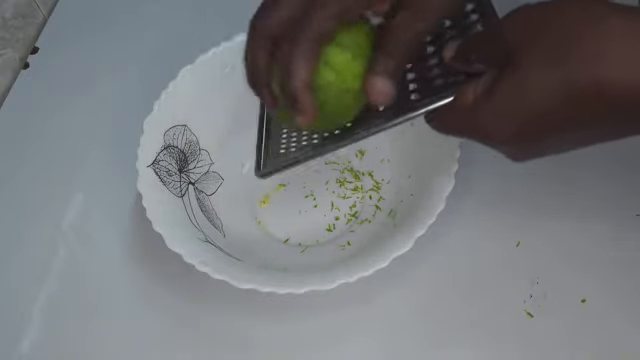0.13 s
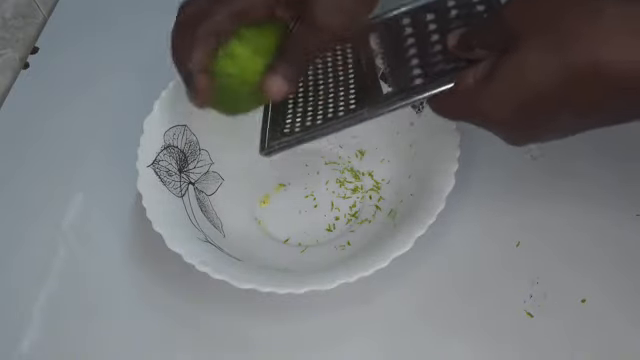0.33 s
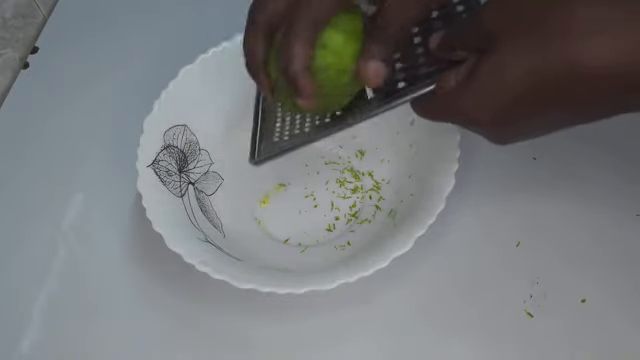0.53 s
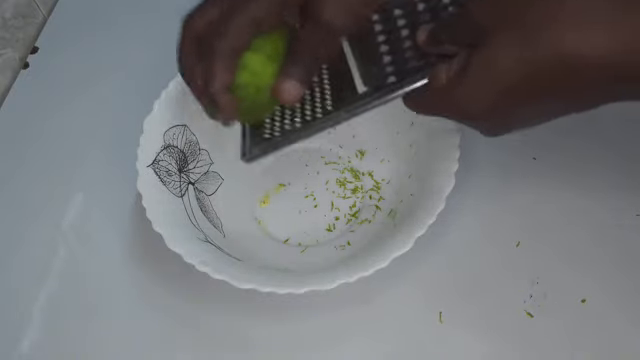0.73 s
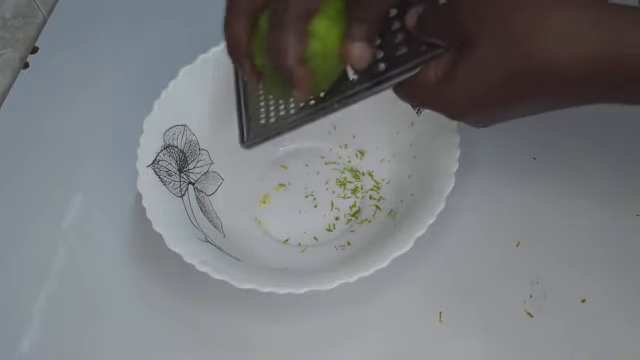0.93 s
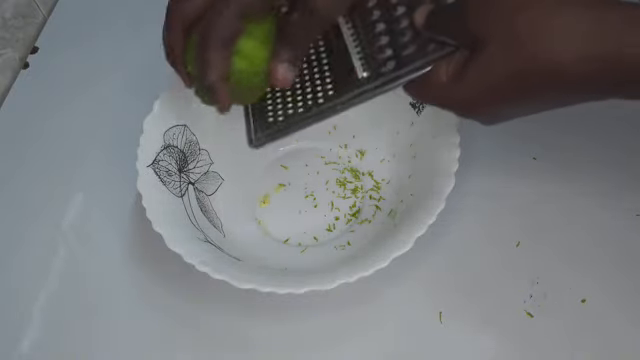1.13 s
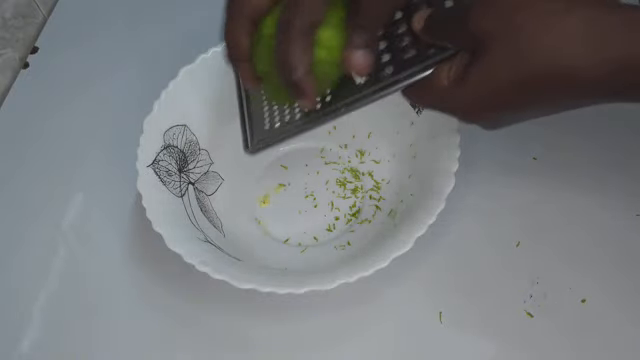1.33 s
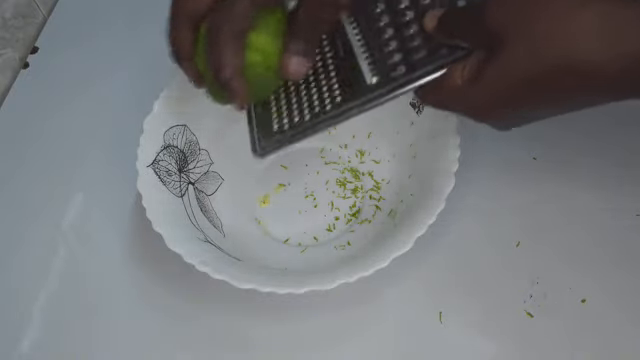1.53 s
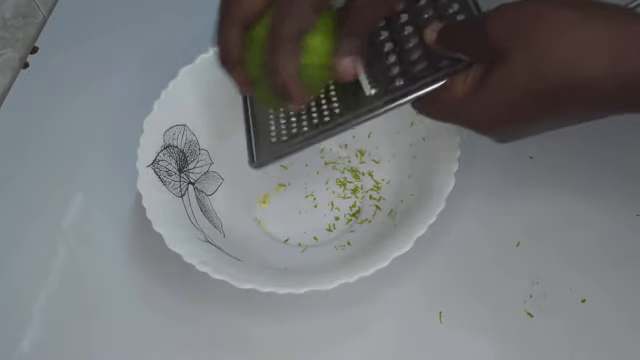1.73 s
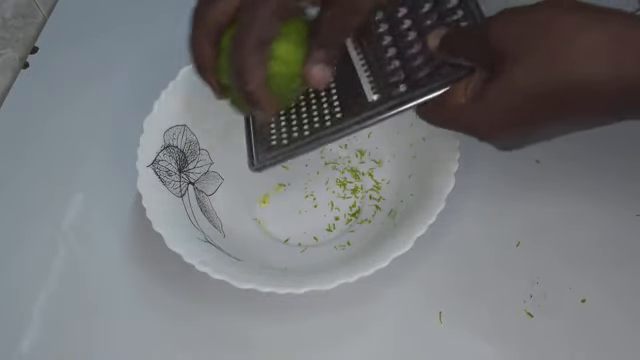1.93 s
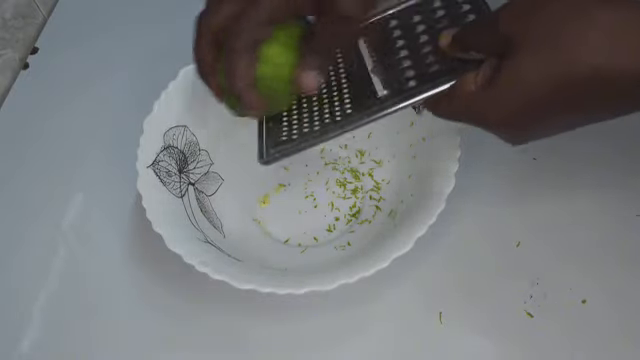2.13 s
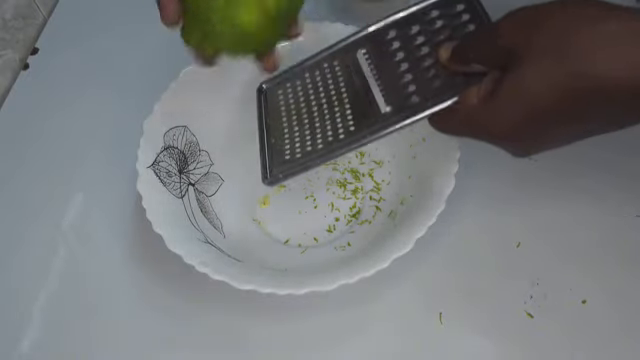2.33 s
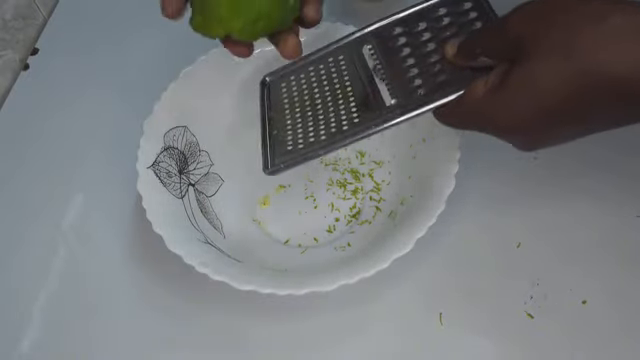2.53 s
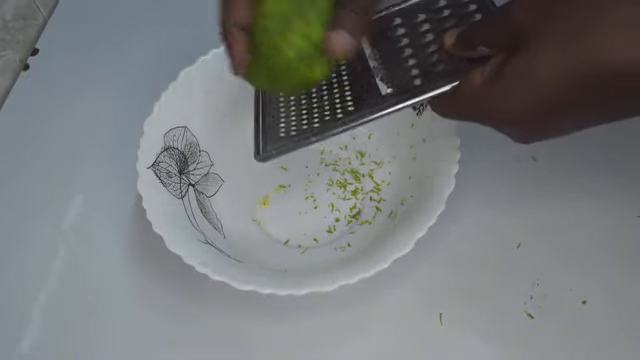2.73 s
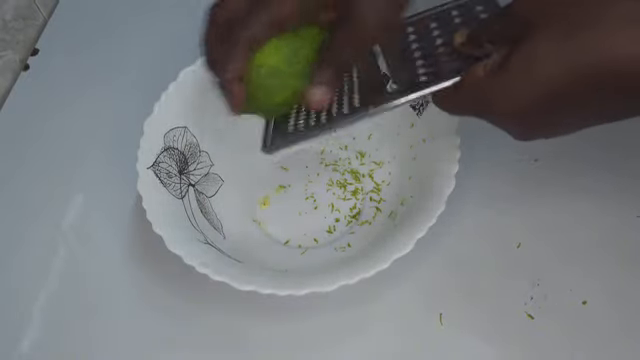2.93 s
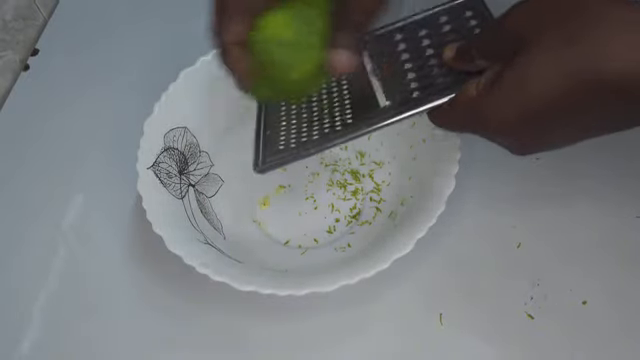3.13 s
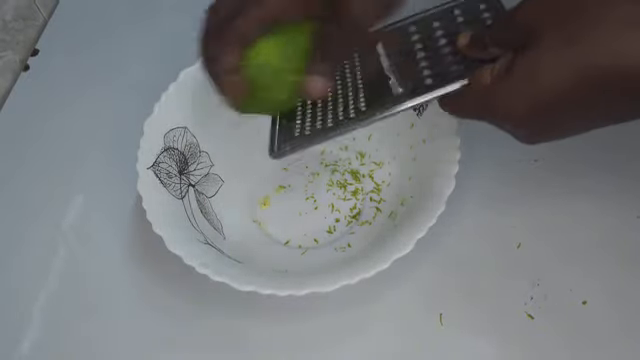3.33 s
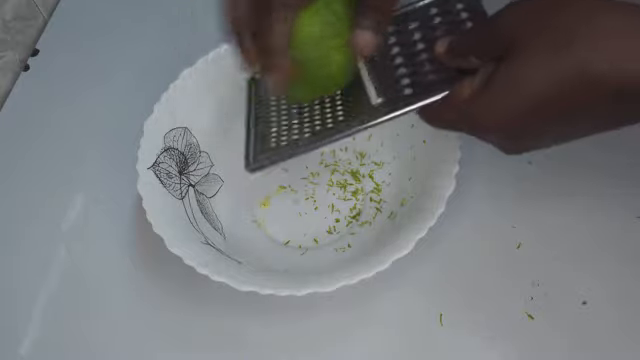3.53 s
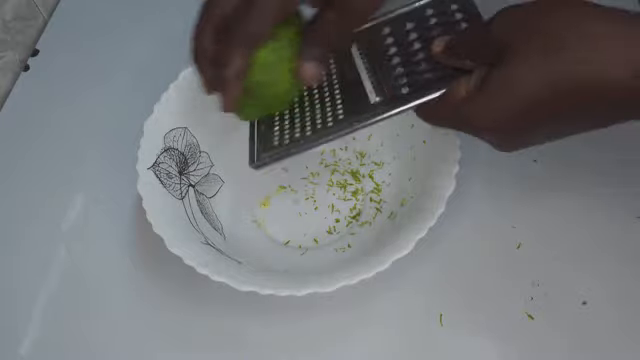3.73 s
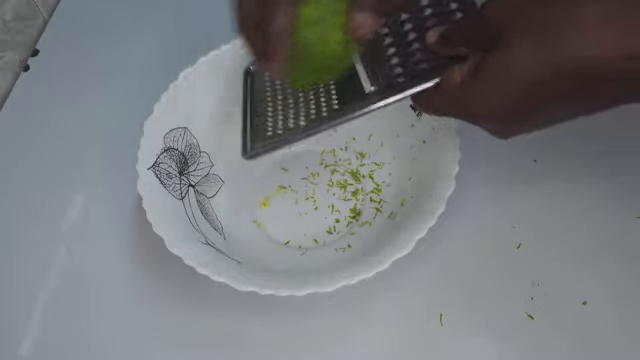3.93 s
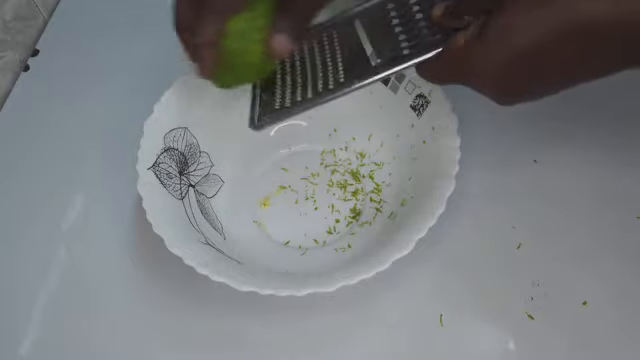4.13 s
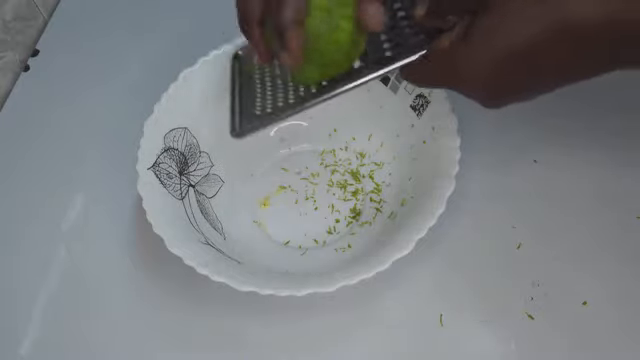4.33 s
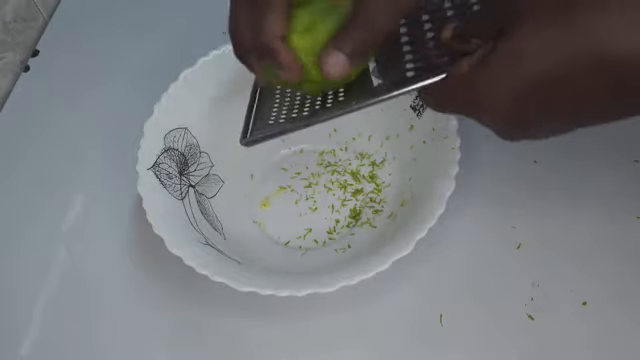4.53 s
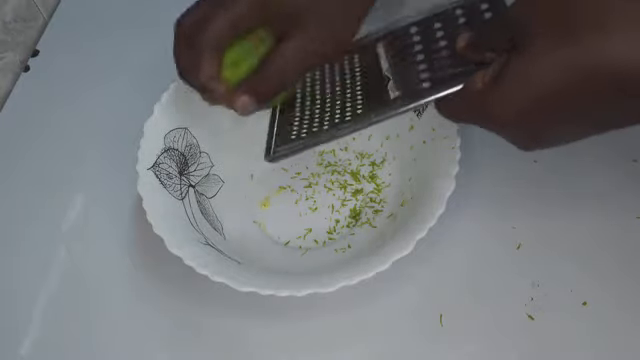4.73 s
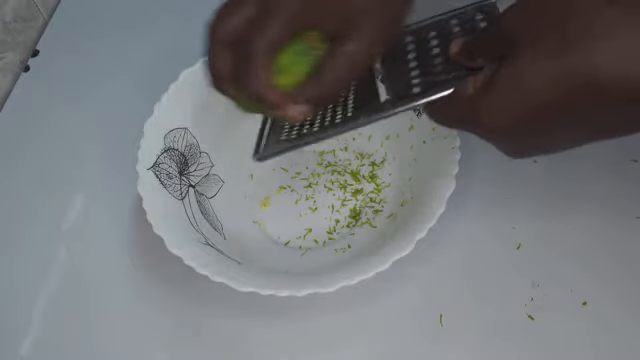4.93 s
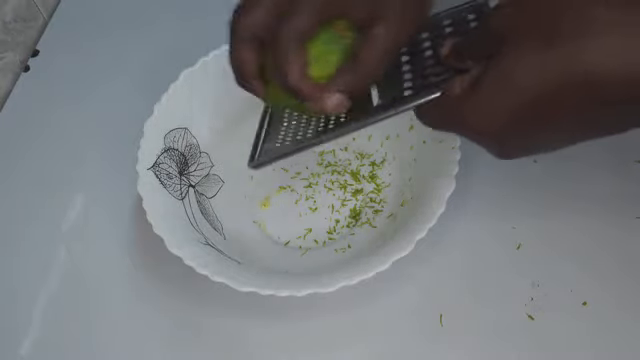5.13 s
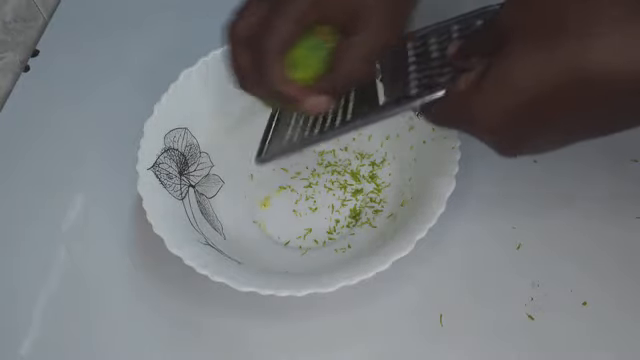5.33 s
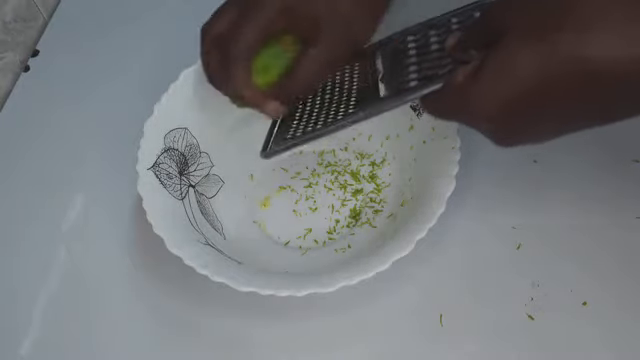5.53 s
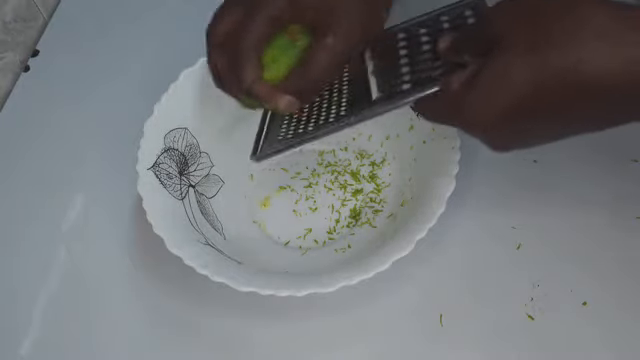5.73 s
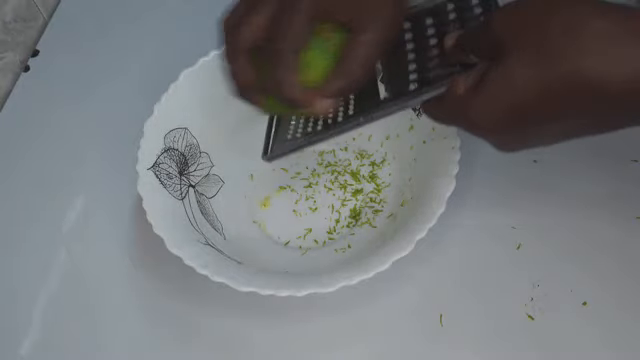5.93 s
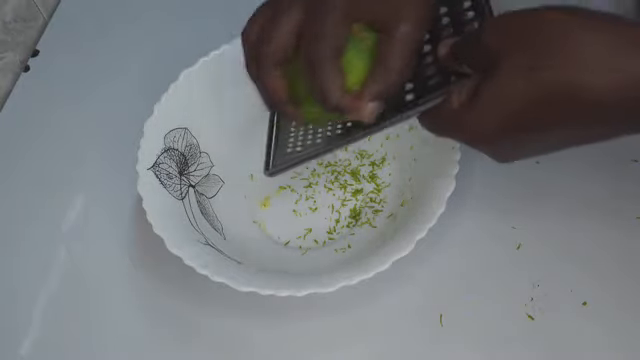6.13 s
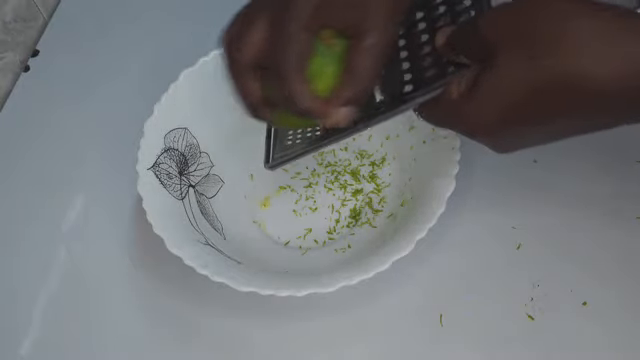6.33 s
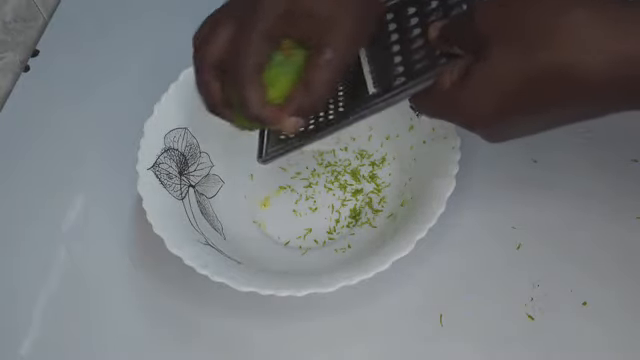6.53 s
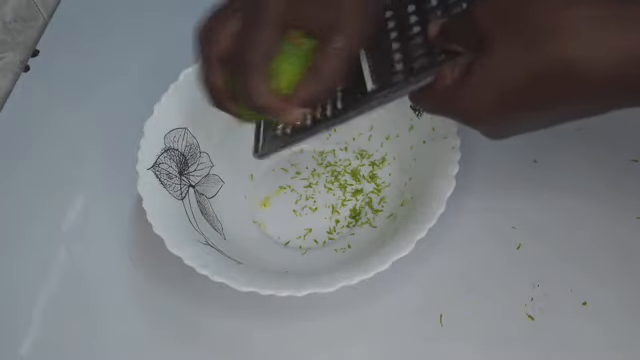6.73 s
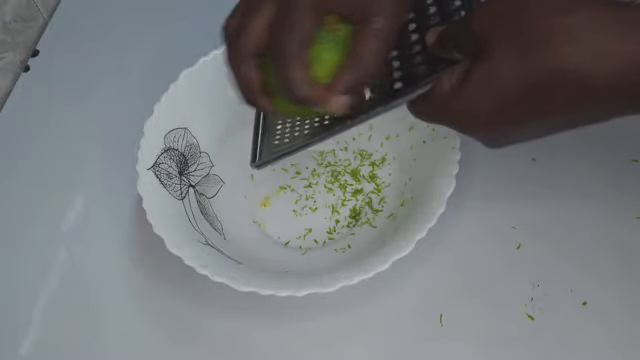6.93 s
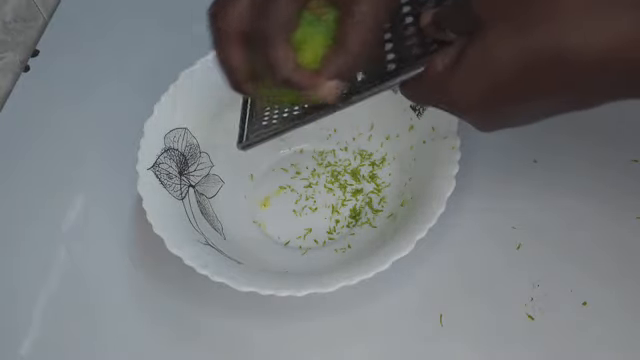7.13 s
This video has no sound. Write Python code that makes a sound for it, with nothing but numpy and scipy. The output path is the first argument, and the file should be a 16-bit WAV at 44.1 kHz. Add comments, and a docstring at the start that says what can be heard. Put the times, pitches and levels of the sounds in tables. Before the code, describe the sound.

A lemon is zested on a hand-held steel grater over a bowl in a small, quiet kitchen, heard up close. At first the fruit lands with a soft hollow thud before each short, gritty scrape, two or three times a second. Now and then a tooth snags and snaps free. Later the strokes quicken into steady back-and-forth rubbing over a faint, low handling rumble.

```python
"""A lemon is zested on a flat steel grater held over a china bowl in a small, hard kitchen.
Over quiet room air, the fruit lands with a hollow thud, is pushed over the teeth and lifted, again and
again. Each stroke is a stream of tiny tears in the peel that ring the sheet; now and then a tooth snags
and snaps free, the grip shifts with a dull bump, and twice the freed sheet pings. From 4.7 s the fruit
is rubbed to and fro without lifting, over a steady low handling rumble."""
import sys
import numpy as np
from scipy import signal
from scipy.fft import rfft, irfft, next_fast_len
from scipy.io import wavfile
from scipy.ndimage import uniform_filter1d, map_coordinates

SR = 44100
rng = np.random.default_rng(int(sys.argv[2]) if len(sys.argv) > 2 else 0)


def wrap_up_sound(samples):
    """Save the sound to the file named by the first command line argument, as 16-bit audio."""
    columns = np.atleast_2d(samples).T
    # keep every value between -1 and 1, then stretch to whole-number steps
    tamed = np.clip(columns, -1, 1)
    steps = np.round(tamed * 32767).astype(np.int16)
    wavfile.write(sys.argv[1], SR, steps)


N = 320607
RUBBING_FROM_S = 4.7  # from here on the fruit stays on the sheet

# forward pushes over the teeth: t/s, length/s, level/dB, swell from bite to hardest press/dB
PUSHES = [(0.182, 0.1, -30, 12.5), (0.608, 0.1, -29, 10.5), (1.012, 0.099, -32, 5),
          (1.395, 0.08, -29.5, 4.5), (1.764, 0.095, -29, 7.5), (2.101, 0.085, -30, 7),
          (2.91, 0.086, -31, 10), (3.306, 0.092, -32, 6.5), (3.698, 0.11, -35, 1.5), (4.068, 0.087, -30, 9),
          (4.587, 0.096, -28.5, 12.5), (4.926, 0.07, -32, 3), (5.194, 0.067, -32.5, 1.5),
          (5.43, 0.08, -28.5, 5.5), (5.683, 0.056, -31.5, 4), (5.923, 0.075, -28.5, 9.5),
          (6.173, 0.071, -28.5, 6.5), (6.429, 0.085, -29, 3.5), (6.691, 0.085, -26.5, 12),
          (6.945, 0.085, -28, 5.5), (7.208, 0.073, -28, 5)]
# tone colour of tearing peel: f/Hz, level/dB
PEEL_SPECTRUM = [(40, -14), (170, -11.5), (300, -3), (480, 1), (800, 0.5), (1050, -3), (2000, -1.5),
                 (4000, -1.5), (5600, -0.5), (8500, -1), (10500, -5), (12300, -4), (14000, -2.5),
                 (15600, -8)]


def amp(db):
    """Decibels to gain."""
    return 10 ** (np.asarray(db) / 20)


def unit(x):
    """Scale to rms 1."""
    return x / np.sqrt(np.mean(x ** 2) + 1e-20)


def along(points, hz):
    """Read an EQ curve of (f/Hz, level/dB) points on a log frequency axis."""
    f, level = np.transpose(points)
    return np.interp(np.log(hz + 1), np.log(f + 1), level)


def wobble(n, rate):
    """A smooth random curve of n samples, rate knots a second."""
    return map_coordinates(rng.standard_normal(int(n * rate / SR) + 4), [np.arange(n) * rate / SR])


def filtered(x, response):
    """Zero-phase EQ with gain response(hz)."""
    size = next_fast_len(x.shape[-1] + SR // 4)
    return irfft(rfft(x, size) * response(np.fft.rfftfreq(size, 1 / SR)), size)[..., :x.shape[-1]]


def ring(x, level, size=4096):
    """Ring a resonant body of unit energy whose spectrum in dB has the shape level(hz)."""
    cepstrum = irfft(np.log(amp(level(np.fft.rfftfreq(size, 1 / SR)))))
    cepstrum[1:size // 2] *= 2  # minimum phase: the ringing follows the hit
    cepstrum[size // 2 + 1:] = 0
    response = irfft(np.exp(rfft(cepstrum)))
    return signal.fftconvolve(x, response[None] / np.linalg.norm(response), axes=1)[:, :N]


def grains(n, rate, spread_db):
    """Tiny tears at random moments and of random sizes, rms 1."""
    hits = rng.random(n) < rate / SR
    polarity = np.sign(rng.standard_normal(n))
    sizes = amp(spread_db * np.clip(rng.standard_normal(n), -2, 2))
    return unit(hits * polarity * sizes)


def place(track, s, forces, direct_db, room_db, bowl_t60=0.014, room_t60=0.28, build_s=0.0036):
    """Mix each row of forces in at time s: direct sound, scatter off bowl and table, kitchen walls."""
    t = np.arange(SR // 3) / SR
    bowl = unit(amp(-60 * t / bowl_t60))
    walls = amp(room_db) * unit(amp(-60 * t / room_t60) * (1 - np.exp(-(t / build_s) ** 2)))
    paths = rng.standard_normal((len(forces), 2, len(t))) * np.hypot(bowl, walls) / np.sqrt(len(t))
    paths[:, [0, 1], [0, 3]] += amp(direct_db)  # direct sound arrives three samples earlier on the left
    paths /= np.linalg.norm(paths, axis=2, keepdims=True)
    start = max(round(s * SR), 0)
    heard = signal.fftconvolve(forces[:, None], paths, axes=2).sum(axis=0)[:, :N - start]
    track[:, start:start + heard.shape[1]] += heard


def room_air(level_db=-73, mono_hz=500):
    """A quiet bed of room air, alike on both sides in the bass."""
    # room tone: f/Hz, level/dB
    air_spectrum = [(20, -4.5), (45, -6), (120, -14), (200, -18), (400, -26.5), (500, -16), (620, -31),
                    (1500, -34.5), (4000, -37), (9500, -46.5), (11700, -38), (15500, -46)]
    middle = rng.standard_normal(N)
    sides = filtered(rng.standard_normal((2, N)), lambda hz: hz / (hz + mono_hz))
    return amp(level_db) * unit(filtered(middle + sides, lambda hz: amp(along(air_spectrum, hz))))


def handling(lifted_db=-79, rubbing_db=-70, push_db=5, lag_s=0.022, width_s=0.11):
    """The held grater rumbles: a little after each single push, steadily once the fruit is rubbed."""
    # handling rumble: f/Hz, level/dB
    rumble_spectrum = [(20, -20), (52, -4), (63, -12), (69, 3.5), (76, -6), (100, -12), (150, -13),
                       (400, -51.5), (1000, -100)]
    t = np.arange(N) / SR
    effort = sum(np.exp(-((t - s - length - lag_s) / width_s) ** 2) for s, length, *_ in PUSHES)
    level_db = np.where(t < RUBBING_FROM_S, lifted_db + push_db * effort, rubbing_db)
    rumble = unit(filtered(rng.standard_normal(N), lambda hz: amp(along(rumble_spectrum, hz))))
    return uniform_filter1d(amp(level_db), size=SR // 20) * rumble


def peel_on_steel(hz, ringing=1):
    """Colour in dB of tearing peel heard through the steel sheet; ringing scales the resonances."""
    # resonances of the hand-held sheet: f/Hz, width/Hz, level/dB
    sheet_modes = [(236, 12, 7), (657, 100, 3.5), (1318, 274, 7), (2956, 330, 4.5), (4600, 46, 5),
                   (6430, 110, 3), (7370, 200, 6.5), (8000, 230, 1), (11560, 460, 7), (13600, 260, -6)]
    steel = sum(db / (1 + (2 * (hz - centre) / width) ** 2) for centre, width, db in sheet_modes)
    return along(PEEL_SPECTRUM, hz) + ringing * steel


def snags(gain_db=-2.0, snap_s=0.0031, thin_hz=1800, thin_db=8, patches=2):
    """A freed tooth flicks the sheet, which rings brighter than under the damping peel."""
    # a tooth snaps free: t/s, level/dB
    snaps = [(0.027, -56), (0.277, -23), (0.574, -44), (0.613, -36.5), (1.022, -32), (1.467, -28),
             (2.528, -69), (3.384, -22), (3.686, -39.5), (4.073, -32.5), (4.431, -40.5), (4.507, -55.5),
             (4.665, -21.5), (5.246, -22), (5.33, -25.5), (5.582, -22.5), (5.751, -27)]
    track, t = np.zeros((2, N)), np.arange(SR // 50) / SR
    for s, db in snaps:
        snap = amp(db + gain_db) * np.exp(-(t / snap_s) ** 4) * rng.standard_normal((patches, len(t)))
        place(track, s, snap / np.sqrt(patches), direct_db=-2, room_db=-6.5)
    return ring(track, lambda hz: peel_on_steel(hz, ringing=1.5) - thin_db / (1 + (hz / thin_hz) ** 2))


def hollow_body(hz):
    """Colour in dB of the grater's hollow body under a soft blow."""
    # low resonances: f/Hz, width/Hz, level/dB
    body_modes = [(100, 67, -11.5), (269, 50, -2), (373, 70, -2), (524, 50, -5.5), (612, 40, 4),
                  (734, 110, -2.5), (885, 100, -2), (1330, 200, -10), (1800, 200, -16)]
    power = sum(amp(db) ** 2 / (1 + ((hz ** 2 - centre ** 2) / (width * (hz + 1))) ** 2)
                for centre, width, db in body_modes)
    return 10 * np.log10(power)


def landings(thud_db=14, squash_db=-7.0, squash_t60=0.025, tick_db=3.0, tick_t60=0.036,
             attack_s=0.001943, creak_db=-12, creak_t60=0.34, patches=2):
    """The soft fruit lands on a few teeth with a hollow thud and a tick, then creaks as it settles."""
    # the fruit is set down: t/s, level/dB, tick offset/dB
    touchdowns = [(0.15, -40.5, -2), (0.521, -38.5, -13.5), (0.92, -50.5, -1), (1.327, -46, -7),
                  (1.695, -47, -5.5), (2.064, -46, -2), (2.853, -40, -6.5), (3.263, -41, -12),
                  (3.605, -37, -6), (4.019, -35.5, -18.5), (4.377, -36.5, -8)]
    thuds, ticks, t = np.zeros((2, N)), np.zeros((2, N)), np.arange(SR // 8) / SR
    attack = 1 - np.exp(-t / attack_s)
    creak = amp(creak_db - 60 * t / creak_t60)
    for s, db, bright_db in touchdowns:
        tears = np.array([grains(len(t), rate=2500, spread_db=3) for _ in range(patches)])
        teeth = attack * tears / np.sqrt(patches)
        blow = amp(squash_db) * (amp(-60 * t / squash_t60) + creak) * teeth
        blow[0, round(2 * attack_s * SR)] += amp(thud_db)  # one impulse carries the thud
        place(thuds, s, amp(db) * blow, direct_db=3, room_db=-0.5)
        tick = amp(db + bright_db + tick_db) * (amp(-60 * t / tick_t60) + creak / 2) * teeth
        place(ticks, s, tick, direct_db=-4.5, room_db=-1.0)
    return ring(thuds, hollow_body) + ring(ticks, peel_on_steel)


def strokes(lifted_rasp_db=-0.8, rubbing_rasp_db=-0.3, catch_swell_db=-7.5, catch_rasp_db=-4.5,
            return_s=0.078, turn_s=0.045, return_db=-40.5, return_swell_db=5, return_rasp_db=3.5):
    """The hand's moves as rows of t/s, length/s, level/dB, swell/dB, low rasp/dB."""
    # the peel catches on the way back, thin and hardest at once: t/s, length/s, level/dB
    catches = [(5.332, 0.023, -38.5), (5.573, 0.029, -37.5)]
    rows = [(s, length, db, catch_swell_db, catch_rasp_db) for s, length, db in catches]
    for s, length, db, swell_db in PUSHES:
        rubbing = s > RUBBING_FROM_S
        rows.append((s, length, db, swell_db, rubbing_rasp_db if rubbing else lifted_rasp_db))
        if rubbing:  # a light return over the blunt backs of the teeth leads the push
            rows.append((s - turn_s - return_s, return_s, return_db, return_swell_db, return_rasp_db))
    return rows


def pressure(t, length, swell_db, bite_s=0.0094, swell_share=0.7, release_s=0.016,
             graze_db=18, ease_db=6, let_go_db=31, off_db=78):
    """A stroke's envelope in dB, 0 where the swell ends: quick bite, swell, slight easing, release."""
    moments = [0, bite_s, swell_share * length, length, length + release_s, length + 2 * release_s]
    levels = [-swell_db - graze_db, -swell_db, 0, -ease_db, -let_go_db, -off_db]
    return np.interp(t, np.maximum.accumulate(moments), levels)


def scraping(gain_db=-0.7, rasp_hz=1400, clump_db=1.0, shift_db=6, patches=3):
    """The teeth bite, tear the peel harder as the push builds and let go; the tears ring the sheet."""
    track, t = np.zeros((2, N)), np.arange(SR // 6) / SR
    for start, length, db, swell_db, rasp_db in strokes():
        push = amp(db + pressure(t, length, swell_db))
        clumps = unit(amp(clump_db * wobble(len(t), rate=261.4)))  # rows of teeth meet the peel
        # the load shifts between patches of teeth, each with its own paths, so the colour keeps moving
        load = amp(shift_db * np.array([wobble(len(t), rate=23.2) for _ in range(patches)]))
        load /= np.linalg.norm(load, axis=0)
        tears = np.array([grains(len(t), rate=2600, spread_db=4.5) for _ in range(patches)])
        forces = push * clumps * load * tears
        rasp = filtered(forces, lambda hz: amp(rasp_db / (1 + (hz / rasp_hz) ** 4)))  # low shelf
        place(track, start, rasp, direct_db=-7, room_db=-1.03)
    return amp(gain_db) * ring(track, peel_on_steel)


def grip_bumps(half_length_s=0.045, width_hz=14):
    """The grater shifts in the hand with a dull bump: a soft swell of narrow, low noise."""
    # shifts of the grip: t/s, f/Hz, level/dB
    shifts = [(0.32, 237, -65), (0.43, 168, -68.5), (2.99, 120, -67), (4.68, 130, -59.5), (5.5, 213, -56.5),
              (5.9, 71.6, -64), (6.79, 78, -60), (6.88, 76, -54.5), (7.09, 72, -55)]
    track, t = np.zeros(N + SR), np.arange(SR // 2) / SR
    swell = np.exp(-((t - t.mean()) / half_length_s) ** 2)
    for s, pitch_hz, db in shifts:
        noise = rng.standard_normal(len(t))
        bump = swell * filtered(noise, lambda hz: 1 / (1 + ((hz - pitch_hz) / width_hz) ** 4))
        start = max(round((s - t.mean()) * SR), 0)
        track[start:start + len(t)] += amp(db) * bump * np.linalg.norm(swell) / np.linalg.norm(bump)
    return track[:N]


def pings():
    """Freed of the fruit, the sheet rings faintly."""
    # modes of the free sheet: f/Hz, level/dB, t60/s
    free_modes = [(2729, 0, 0.1), (4740, -2, 0.097)]
    # pings after the fruit lifts off: t/s, level/dB
    lifts = [(2.395, -70), (3.196, -74)]
    track, t = np.zeros((2, N)), np.arange(SR // 6) / SR
    tone = sum(amp(db - 60 * t / t60) * np.sin(2 * np.pi * hz * t) for hz, db, t60 in free_modes)
    for s, db in lifts:
        place(track, s, amp(db) * tone[None], direct_db=6, room_db=-6)
    return track


def scene(mono_hz=720):
    """The mix: the grater sits a little to the left; long waves reach both sides alike."""
    # stereo balance of the grater: f/Hz, left minus right/dB
    balance = [(200, 5), (340, -4.5), (520, 0), (640, 5.5), (900, 3.5), (1250, -0.5), (2400, 2.5),
               (4400, 1), (7500, 2.5), (9400, 5), (11000, 0), (13500, 0.5), (15500, 6)]
    left, right = scraping() + landings() + snags() + pings()
    mid = (left + right) / 2
    side = filtered((left - right) / 2, lambda hz: hz / np.hypot(hz, mono_hz))
    grater = np.array([mid + side, mid - side])
    panned = filtered(grater, lambda hz: amp(np.outer([.5, -.5], along(balance, hz))))
    return panned + handling() + grip_bumps() + room_air()


def record(dry, top_hz=16000):
    """A steep low-pass trims the very top."""
    return filtered(dry, lambda hz: 1 / (1 + (hz / top_hz) ** 240))


dry = scene()
out = record(dry)
wrap_up_sound(out)
```